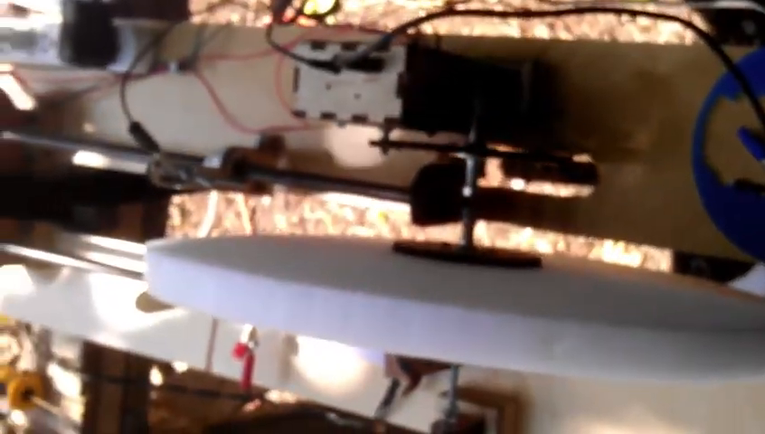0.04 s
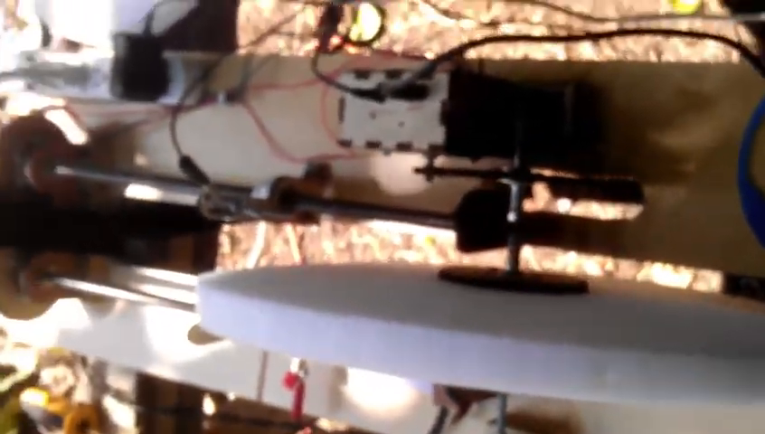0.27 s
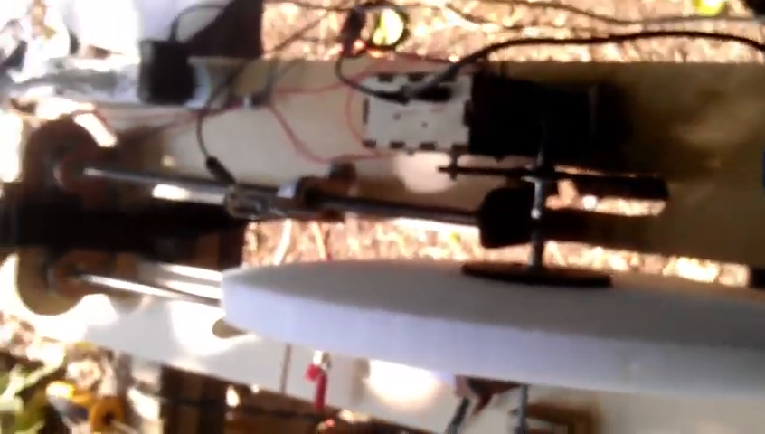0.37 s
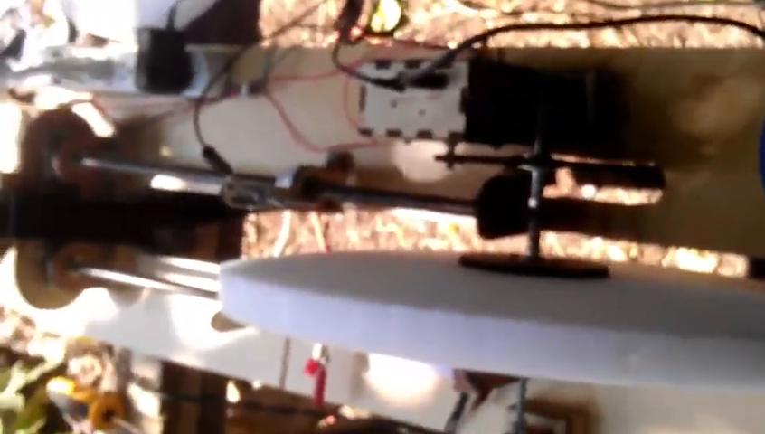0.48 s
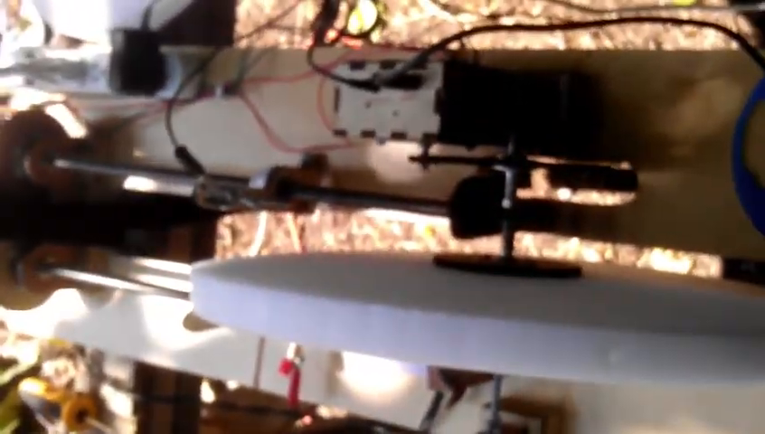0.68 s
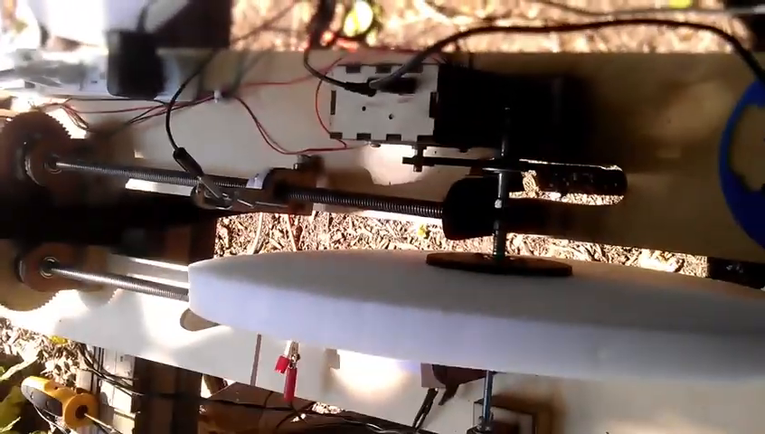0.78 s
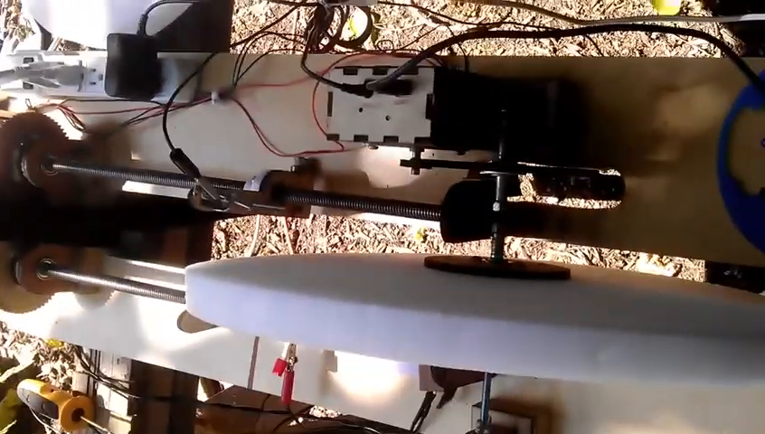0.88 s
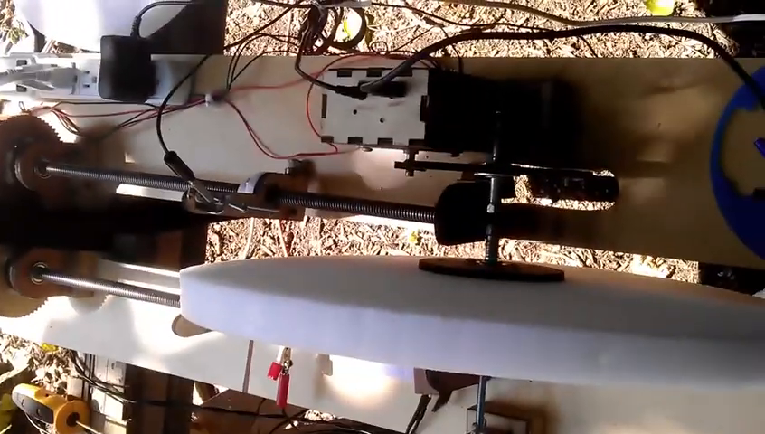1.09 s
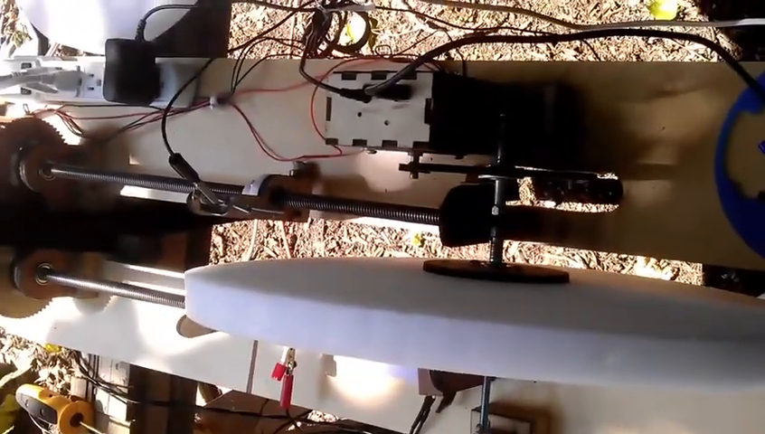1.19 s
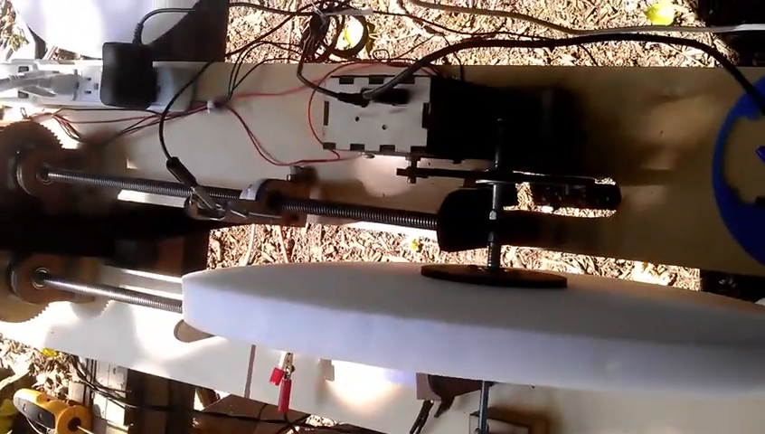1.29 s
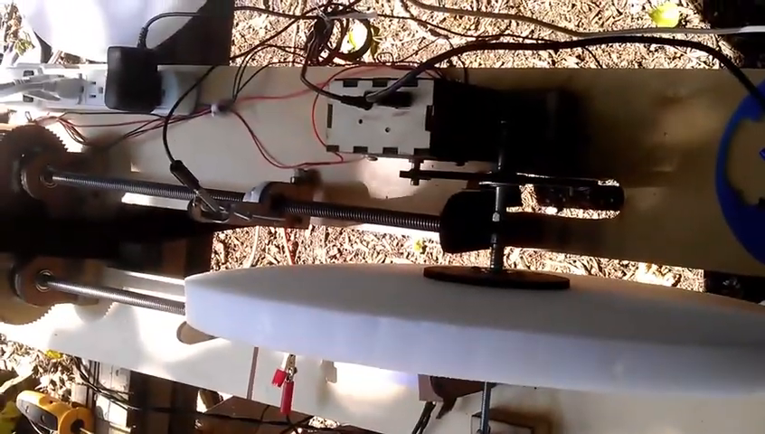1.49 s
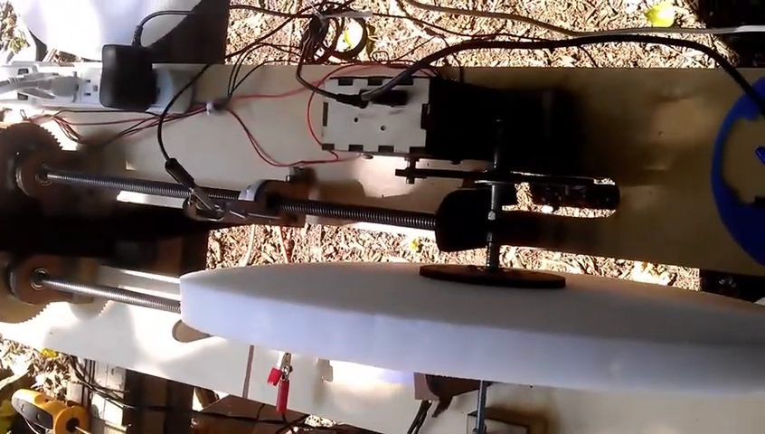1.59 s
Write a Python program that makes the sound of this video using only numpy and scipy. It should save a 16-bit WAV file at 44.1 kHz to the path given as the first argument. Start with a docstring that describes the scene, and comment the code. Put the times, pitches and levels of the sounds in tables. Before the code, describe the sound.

A small mechanical jig, handled close to the microphone, knocks twice and snaps sharply. Loose parts tick faintly, then something slides with a soft hiss and catches in two short creaks, over quiet outdoor air and a low drone.

```python
"""A small motorised jig is handled outdoors, close to two microphones.
Its frame knocks twice and a part snaps home; loose parts tick faintly.
Then something slides with a soft hiss and sticks twice in short stick-slip creaks.
The surroundings answer faintly over quiet air, a low drone and a thin whine.
The recorder widens the stereo with a short delayed copy."""
import sys
import numpy as np
from scipy import signal
from scipy.fft import rfft, irfft
from scipy.io import wavfile

SR = 44100
rng = np.random.default_rng(int(sys.argv[2]) if len(sys.argv) > 2 else 0)


def to_wav(sig):
    """Store sig (one row per channel, or 1-D mono) as 16-bit WAV at the path in sys.argv[1].

    Samples outside -1..1 are clipped; the rate is SR.
    """
    pcm = np.clip(np.atleast_2d(sig), -1, 1) * 32767
    pcm = np.round(pcm).astype(np.int16)
    wavfile.write(sys.argv[1], SR, pcm.T)  # frames by channels


N = 72765
RIGHT_LAG_S = .00005

# Ring of the frame. Each row: frequency in Hz, gain in dB.
FRAME_RING = [(60, -46.5), (200, -13.5), (440, -1.5), (620, -16), (840, 0.5), (1150, -8.5), (1900, -3),
              (2500, -7), (3300, -19.5), (4500, -14), (7500, -18), (10000, -13), (13500, -26)]


def amp(db):
    """Decibels to gain."""
    return 10 ** (np.asarray(db) / 20)


def read(table, hz, column=1):
    """One column of a spectrum table, interpolated over log frequency."""
    rows = np.array(table)
    return np.interp(np.log(hz + 1), np.log(rows[:, 0] + 1), rows[:, column])


def envelope(table, column=1):
    """One column of a dB curve as a gain per sample."""
    rows = np.array(table)
    return amp(np.interp(np.arange(N) / SR, rows[:, 0], rows[:, column]))


def add(mix, start_s, sound):
    """Mixes a stereo sound in place."""
    part = mix[:, max(round(start_s * SR), 0):][:, :sound.shape[-1]]
    part += sound[..., :part.shape[1]]


def pan(left_over_right_db):
    """Left and right gains."""
    return amp(np.array([[left_over_right_db / 2], [-left_over_right_db / 2]]))


def click(colour, corner_hz=np.inf, lag_s=0, column=1, order=1, extra_db=np.zeros_like):
    """Causal, low-passed click; bending waves carry its treble ahead of its bass."""
    spread_s, spread_hz = .0016, 3000
    hz = np.fft.fftfreq(2048, 1 / SR)
    log_gain = np.log(amp(read(colour, abs(hz), column) + extra_db(abs(hz))))
    log_gain -= .5 * np.log(1 + (hz / corner_hz) ** (2 * order))
    log_min_phase = signal.hilbert(log_gain).conj()
    lag_turns = hz * lag_s + spread_s * spread_hz * np.sign(hz) * np.log1p(abs(hz) / spread_hz)
    return np.fft.ifft(np.exp(log_min_phase - 2j * np.pi * lag_turns)).real


def noise(shape_db):
    """Stereo noise of unit RMS, more alike in the bass."""
    # Each row: frequency in Hz, left-right correlation from 0 to 1.
    likeness = [(50, 1), (250, 0.97), (800, 0.99), (2000, 0.35), (5000, 0.46), (10000, 0.44)]
    hz = np.fft.rfftfreq(N, 1 / SR)
    left, independent = rfft(rng.standard_normal((2, N)))
    correlation = read(likeness, hz)
    right = correlation * left + np.sqrt(1 - correlation ** 2) * independent
    stereo = irfft(np.array([left, right]) * amp(shape_db(hz)), N)
    return stereo / stereo.std()


def background():
    """Quiet outdoor air, a wavering distant drone and a thin, high whine."""
    # Spectra. Each row: frequency in Hz, relative density in dB.
    air_colour = [(25, -26), (65, -20), (110, -12), (150, -9), (195, -4), (250, -2), (330, -3), (600, -4),
                  (830, -2), (1300, -12), (2100, -14), (3000, -21), (4100, -19), (6500, -28), (9300, -24),
                  (12200, -36), (12900, -60)]
    drone_colour = [(70, -34), (150, -13), (190, 1), (240, -2.5), (330, -27.5), (600, -49)]
    # Level curves. Each row: time in seconds, level in dB.
    air_levels = [(0, -62.5), (.2, -60), (.5, -62), (1.3, -61), (1.65, -63)]
    drone_levels = [(0, -64.5), (.15, -69), (.45, -76.5), (.6, -70), (.86, -67), (1.0, -74), (1.09, -69),
                    (1.3, -72), (1.65, -73)]
    whine_hz, half_width_hz, whine_db = 9480, 39, -85
    whine = noise(lambda hz: -20 * np.log10(1 + ((hz - whine_hz) / half_width_hz) ** 2))
    drone = noise(lambda hz: read(drone_colour, hz)) * envelope(drone_levels)
    air = noise(lambda hz: read(air_colour, hz)) * envelope(air_levels)
    return air + drone + amp(whine_db) * whine


def tick(bass_hz, treble_hz):
    """A loose part touches the frame; the smaller the part, the less bass."""
    def bass_cut_db(hz):
        return -10 * np.log10(1 + (bass_hz / (hz + 1)) ** 2)
    return pan(0) * click(FRAME_RING, treble_hz, order=2, extra_db=bass_cut_db)


def knock(corner_hz, pan_db):
    """A blow on the frame; a softer blow has less treble."""
    left = click(FRAME_RING, corner_hz)
    right = click(FRAME_RING, corner_hz, RIGHT_LAG_S)
    return pan(pan_db) * np.array([left, right])


def snap():
    """A hard part snaps home close to the microphones."""
    # Each row: frequency in Hz, left gain in dB, right gain in dB.
    colour = [(102, -25, -20.5), (405, 0.5, -1), (880, -14, -6), (1520, -11.5, 2), (2400, 7.5, -2.5),
              (3100, 6.5, 4), (3970, 10.5, 7.5), (4870, -4, 2.5), (4900, 11.5, 7), (5550, -6.5, -7),
              (6200, 8.5, 0.5), (7400, -1.5, -10), (8320, -9.5, 7), (10100, -3, 1.5), (11670, -7.5, -11),
              (13200, -19.5, -22)]
    return np.array([click(colour, column=1), click(colour, lag_s=RIGHT_LAG_S, column=2)])


def sliding():
    """Hiss of a sliding part: low body, fine fizz, narrow rubbing resonance and bright top."""
    # Spectra. Each row: frequency in Hz, relative density in dB.
    body = [(60, -29), (200, 1.5), (450, -1), (900, -2.5), (1250, -7), (1650, -8.5), (2600, -17),
            (5000, -25.5), (13000, -60)]
    fizz = [(500, -22), (2000, 6), (3000, -0.5), (4350, 6), (5200, -8), (7000, -10.5), (8600, -2),
            (9400, 0.5), (10500, -16), (12300, -23), (13000, -42)]
    rub = [(1000, -43), (1650, -9), (1950, -3), (2250, -13), (3200, -37)]
    top = [(3000, -42), (8000, -2), (11300, -1.5), (12500, -6), (13500, -26)]
    # Each row: time in seconds, then levels of body, fizz, rub and top in dB.
    levels = [(.59, -79, -101, -97, -100), (.635, -58, -70, -78, -81), (.69, -60.5, -61, -63.5, -69.5),
              (.77, -57.5, -74.5, -68, -87), (.86, -60, -62.5, -67, -69), (.95, -58.5, -68.5, -84, -87),
              (1.02, -66, -76, -78, -100), (1.10, -64, -65, -63.5, -100), (1.20, -62, -65, -67, -82),
              (1.28, -58, -67, -68.5, -82), (1.33, -62, -71.5, -75, -96), (1.36, -65, -73.5, -81, -70),
              (1.385, -69, -78, -83, -95), (1.46, -68, -83, -92, -100)]
    return sum(noise(lambda hz: read(colour, hz)) * envelope(levels, column)
               for column, colour in enumerate([body, fizz, rub, top], start=1))


def creak(length_s, first_rate_hz, last_rate_hz, level_db, swell_db, corner_hz, upper_db):
    """Stick-slip: uneven slips at a gliding rate, each ringing the same small part."""
    # Ring of one slip. Each row: frequency in Hz, gain in dB.
    colour = [(100, -37), (900, -25), (1500, -25.5), (1950, -21), (2250, -22), (2750, -12), (3300, -9.5),
              (3900, -6.5), (4500, -17.5), (5200, -18), (5900, -24), (6500, -21), (7300, -34), (9300, -25),
              (11000, -33), (13000, -50)]
    upper_hz, half_width_hz = 5130, 190
    jitter_periods, swell_peak_fraction = .12, .48
    progress = np.arange(0, length_s, 1 / SR) / length_s
    cycles = np.cumsum(first_rate_hz + (last_rate_hz - first_rate_hz) * progress) / SR
    onsets = np.flatnonzero(np.diff(np.floor(cycles), prepend=-1))
    jitter = rng.standard_normal(64)[:len(onsets)] * jitter_periods * SR / first_rate_hz
    swell = 1 - (progress[onsets] / swell_peak_fraction - 1) ** 2
    slips = np.zeros(len(progress))
    slips[np.clip(onsets + jitter.astype(int), 0, len(slips) - 1)] = amp(level_db + swell_db * swell)
    ring = click(colour, corner_hz, order=4,
                 extra_db=lambda hz: upper_db / (1 + ((hz - upper_hz) / half_width_hz) ** 2))
    return pan(left_over_right_db=9) * np.convolve(slips, ring)


def echo():
    """Dull, diffuse answer of the surroundings to one blow."""
    # Each row: frequency in Hz, gain in dB, time to fall 60 dB in seconds.
    surroundings = [(62, -35, 0.51), (120, -12, 0.32), (176, -5.5, 0.62), (243, 6, 0.26), (300, -4, 0.55),
                    (433, -3.5, 0.55), (645, -3.5, 0.34), (840, -5, 0.45), (2000, -12, 0.27),
                    (3900, -16, 0.2), (6940, -26, 0.33), (10200, -26, 0.54), (12500, -52, 0.16)]
    rise_s = .012
    hz, time_s, spectra = signal.stft(noise(np.zeros_like), SR, nperseg=512)
    decay_per_s = np.log(1000) / read(surroundings, hz, column=2)[:, None]
    decay = np.exp(-decay_per_s * time_s) * np.sqrt(2 * decay_per_s / SR)  # unit energy per band
    spectra *= amp(read(surroundings, hz))[:, None] * decay
    tail = signal.istft(spectra, SR, nperseg=512)[1][:, :N]
    return tail * (1 - np.exp(-np.arange(N) / SR / rise_s))


def scatter(direct):
    """Quick reflections between the parts of the jig."""
    rise_s, decay_s, level_db = .00067, .004, -17
    time_s = np.arange(4096) / SR
    taps = rng.standard_normal((2, len(time_s))) * np.exp(-time_s / decay_s)
    taps *= 1 - np.exp(-time_s / rise_s)
    taps /= np.linalg.norm(taps[0])
    return amp(level_db) * signal.fftconvolve(direct, taps, axes=1)[:, :N]


def mechanism():
    """Knocks, snap, creaks and ticks, each with its reflections and echo."""
    # Each row: start in seconds, level in dB, treble corner in Hz, left over right in dB, echo in dB.
    knocks = [(0.2281, 3, 1030, -8, -2), (0.2344, 4.5, 13000, 5.5, -3)]
    snap_s, snap_db, snap_echo_db = (.2511, 0, 0)
    # Each row: start and length in seconds, first and last slip rate in Hz, level and swell in dB,
    # treble corner in Hz, upper ring gain in dB, echo in dB.
    creaks = [(0.8066, .0054, 985, 2279, -4, 4.5, 12500, 8.5, -1),
              (1.0380, 0.004, 1050, 1675, -6, 0, 8900, 0, -7.5),
              (1.0449, .0008, 1000, 1000, 3, 0, 6200, -18, -1.5),
              (1.05, 0.0088, 331, 218, -19, 2, 4940, -12, -10.5),
              (1.0611, .0015, 1100, 1100, -13, 3, 6000, -6, -17)]
    # Each row: start in seconds, level in dB, bass and treble corners in Hz, echo in dB.
    ticks = [(0.162, -21, 1500, 2940, -16), (0.313, -6.5, 100, 700, -8), (0.381, -16.5, 500, 1800, -11),
             (.414, -24, 900, 2500, -22), (0.626, -22, 1500, 3500, -14), (1.355, -22, 8000, 11000, -35),
             (1.363, -22, 7900, 11000, -35)]
    events = [(start_s, amp(db) * knock(*shape), echo_db) for start_s, db, *shape, echo_db in knocks]
    events += [(snap_s, amp(snap_db) * snap(), snap_echo_db)]
    events += [(start_s, creak(*shape), echo_db) for start_s, *shape, echo_db in creaks]
    events += [(start_s, amp(db) * tick(*shape), echo_db) for start_s, db, *shape, echo_db in ticks]
    direct, echoes = np.zeros((2, 2, N))
    for start_s, sound, echo_db in events:
        add(direct, start_s, sound)
        add(echoes, start_s, amp(echo_db) * echo())
    return direct + scatter(direct) + echoes


def scene():
    """The jig over the background."""
    return mechanism() + sliding() + background()


def record(dry):
    """Bass cut; delayed treble added left and subtracted right; band limit."""
    low_cut_hz, band_limit_hz = 84, 13600
    widen_delay_s, widen_above_hz, widen_db = .01, 990, -5
    stereo = signal.sosfilt(signal.butter(2, low_cut_hz, "high", fs=SR, output="sos"), dry)
    treble = signal.sosfilt(signal.butter(1, widen_above_hz, "high", fs=SR, output="sos"), stereo.mean(0))
    add(stereo, widen_delay_s, amp(widen_db) * np.array([treble, -treble]))
    low_pass = signal.firwin(101, band_limit_hz, window=("kaiser", 8), fs=SR)
    return signal.oaconvolve(stereo, low_pass[None], "same")


dry = scene()
out = record(dry)
to_wav(out)
```